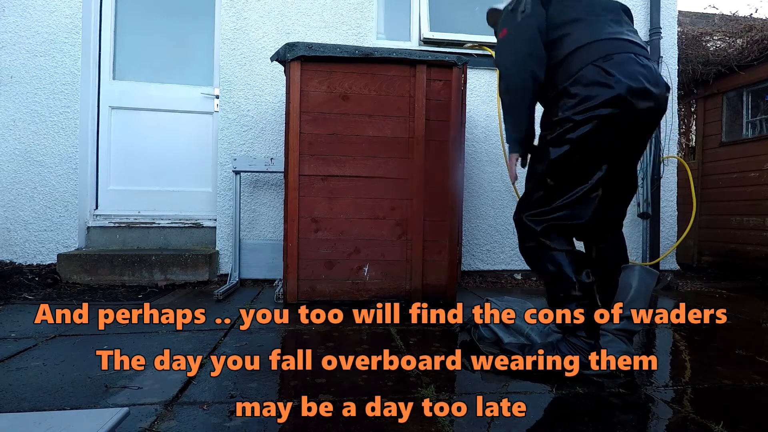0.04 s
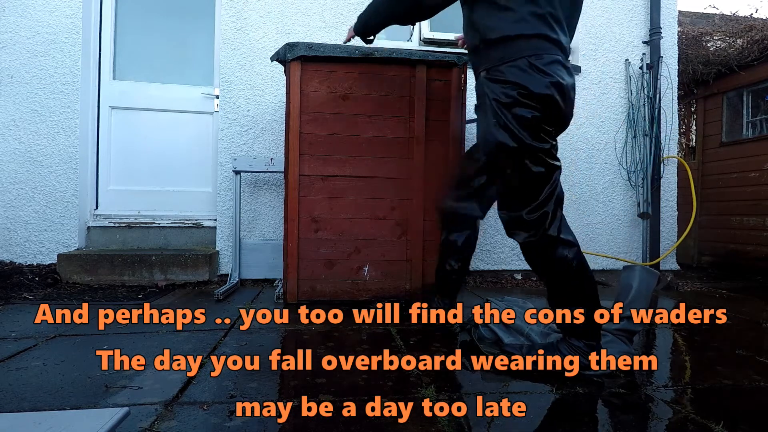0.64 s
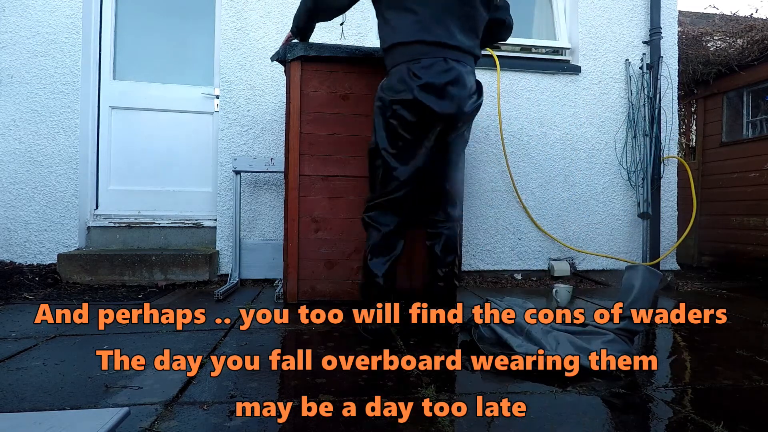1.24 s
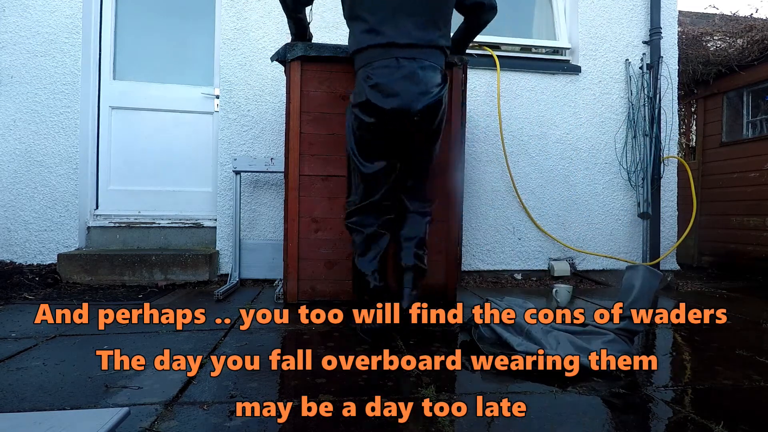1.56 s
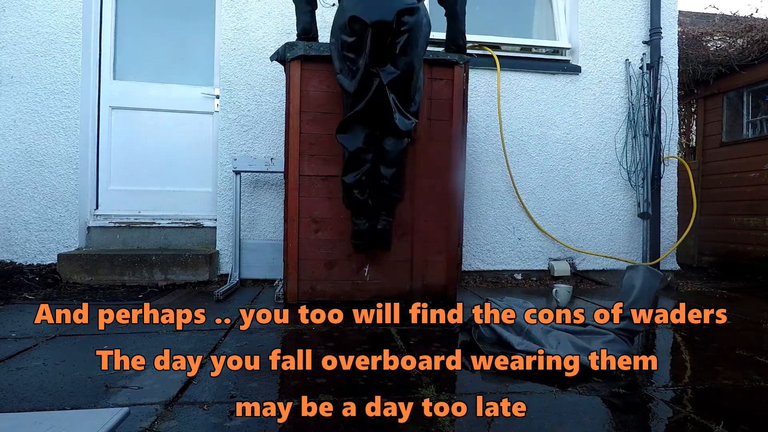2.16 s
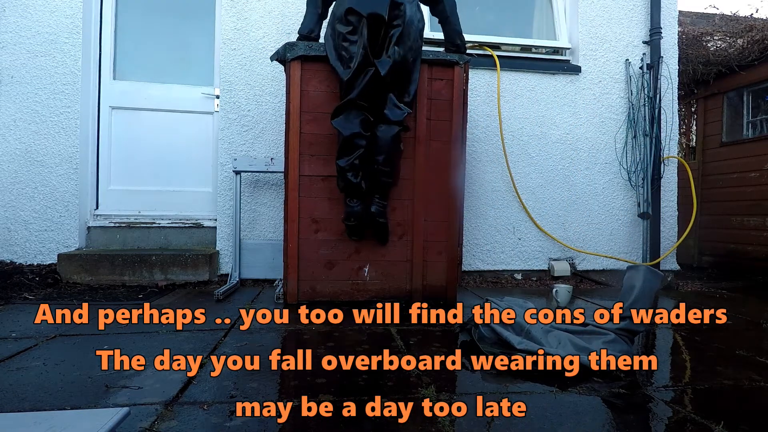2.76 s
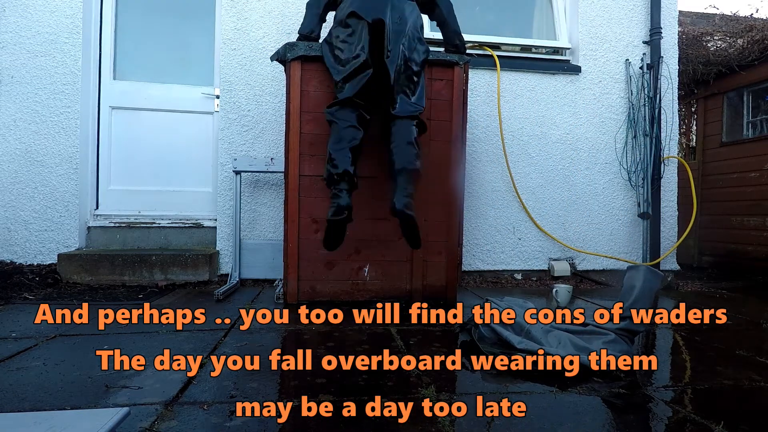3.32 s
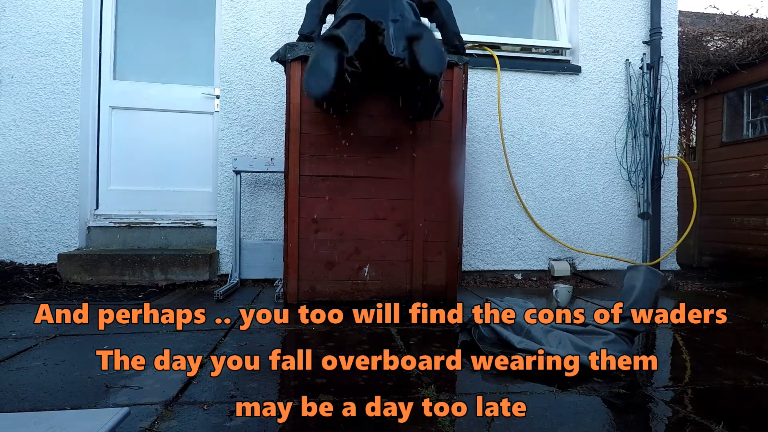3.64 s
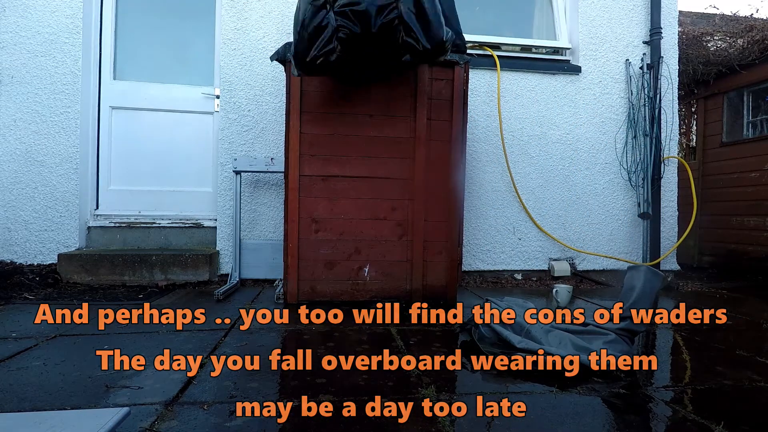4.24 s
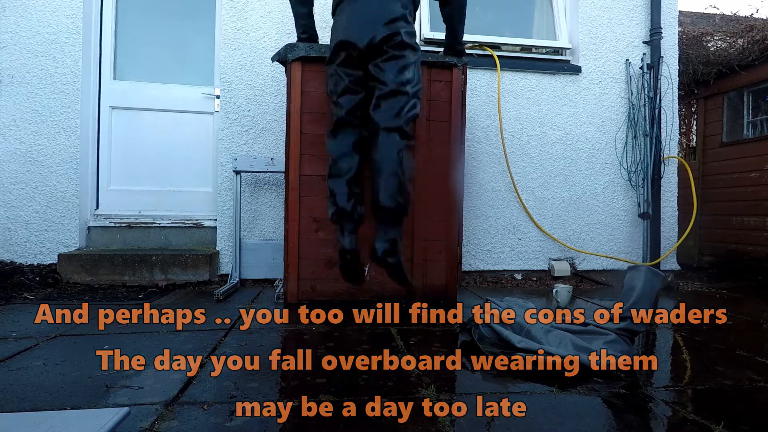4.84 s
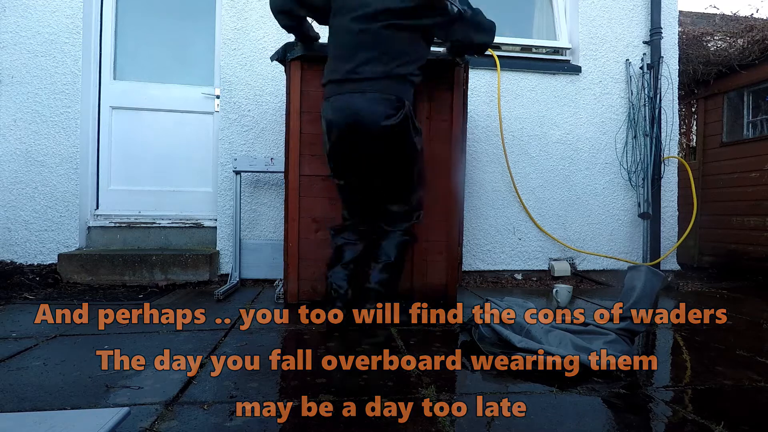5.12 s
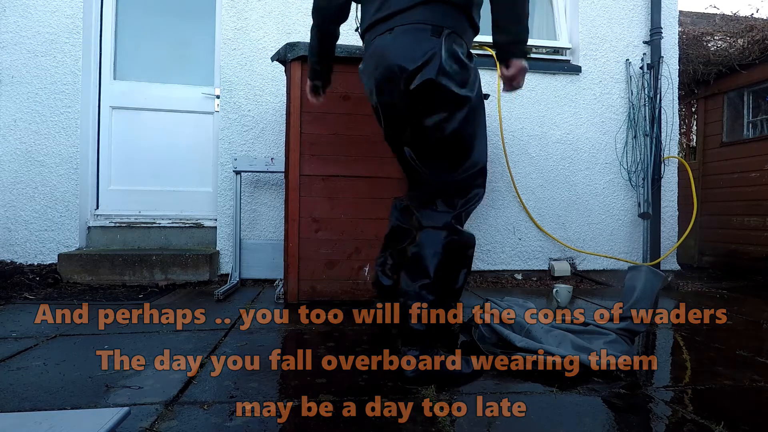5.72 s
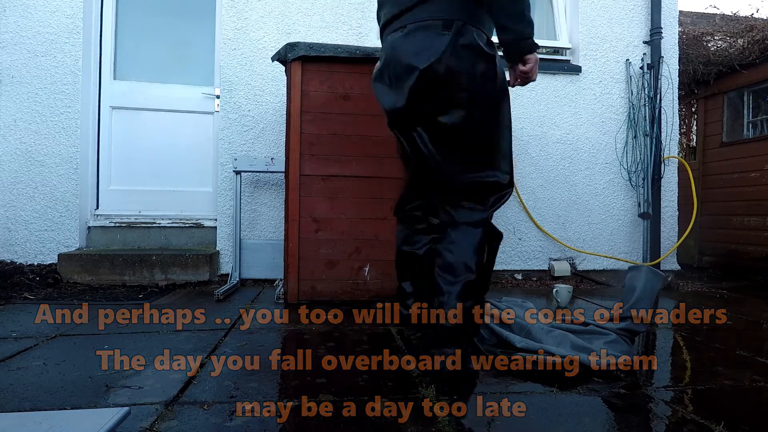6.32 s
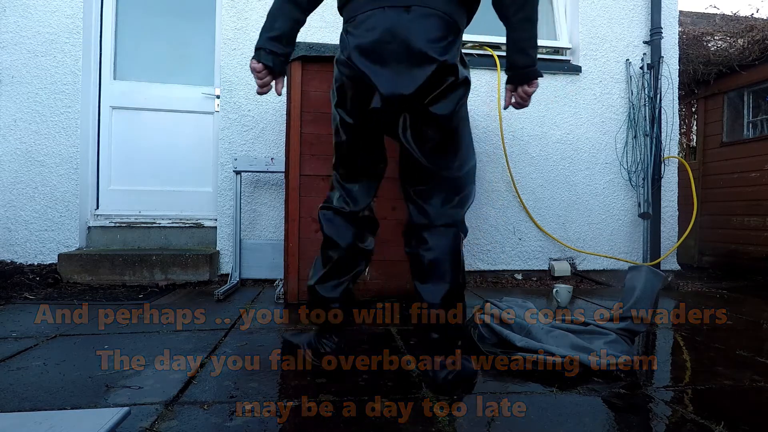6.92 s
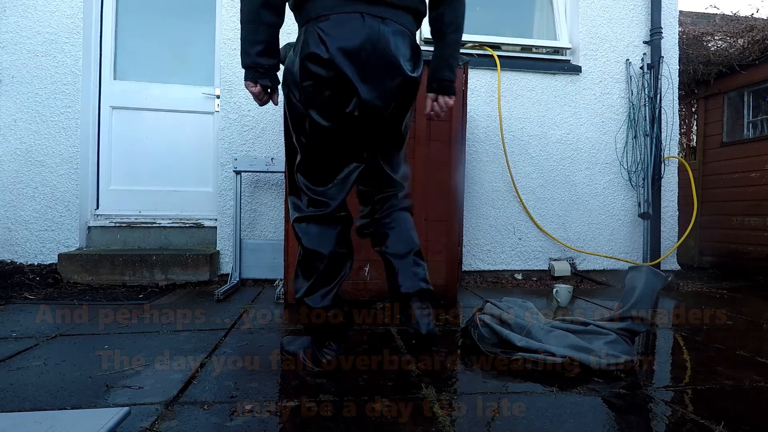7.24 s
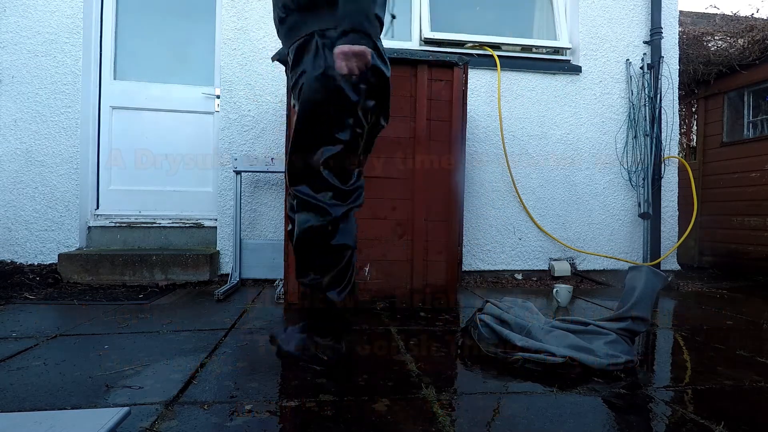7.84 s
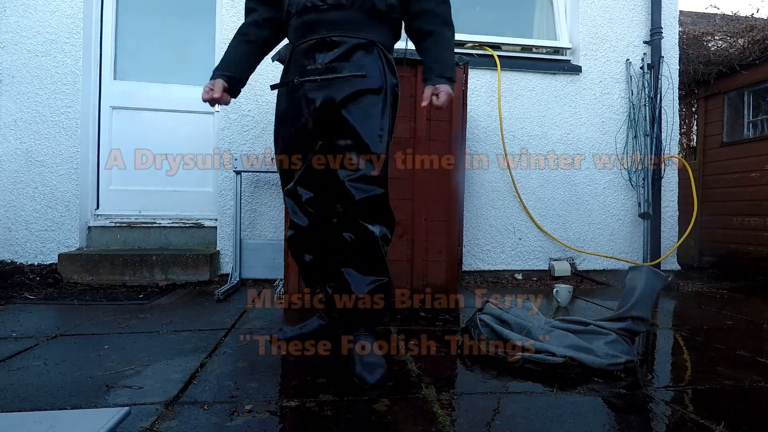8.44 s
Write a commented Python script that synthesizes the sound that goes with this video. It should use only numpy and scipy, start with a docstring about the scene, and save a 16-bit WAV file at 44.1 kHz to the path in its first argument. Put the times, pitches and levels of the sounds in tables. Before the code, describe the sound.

A steady rain-like hiss with fine patter and a low drone runs throughout, outdoors and nearly mono. Wet waders give small, sharp ticks at about 0.7 and 1.6 seconds. Near 2 seconds someone hoists themselves onto a wooden cabinet: the coated cloth snaps taut, rasps and judders over the edge, and a quick cluster of deep, hollow knocks rings the panels until about 2.4 seconds. A soft, lumpy rumble swells with shifts of weight around 3.7 and 4.3 seconds. From 4.6 seconds the waders rasp and judder again as they slide off, bumping the cabinet. At 5 seconds boots land on paving with the loudest dull thuds. More steps and a few crisp cloth snaps follow around 5.4 seconds. Softer, low footsteps and rumble come between 6.6 and 7.1 seconds, then the hiss carries on to the end at about 8.5 seconds.

```python
"""Someone in waders climbs onto a wooden cabinet in a wet yard; nearly mono.
Rain-like hiss and a low drone run throughout; rumble swells with each shift of weight.
From 0.7 s the wet waders tick. Near 2 s, the hoist: they rasp and judder over the edge, the cloth
snaps taut, knocks ring the cabinet. From 4.6 s they rasp and judder again, sliding off.
At 5 s boots land on the paving with dull thuds, then step about until 7.1 s."""
import sys
import numpy as np
from scipy import signal
from scipy.fft import rfft, irfft
from scipy.io import wavfile

SR = 44100
rng = np.random.default_rng(int(sys.argv[2]) if len(sys.argv) > 2 else 0)


def file_out(sig):
    """Save sig as 16-bit WAV at sys.argv[1]."""
    # one column per channel
    cols = np.atleast_2d(sig).T
    # limit, then scale
    lim = np.clip(cols, -1, 1)
    pcm = np.round(lim * 32767).astype(np.int16)
    wavfile.write(sys.argv[1], SR, pcm)


N = 373527
TIME_S = np.arange(N) / SR
BINS_HZ = np.fft.rfftfreq(N, 1 / SR)


def amp(db):
    """dB to gain."""
    return 10 ** (np.asarray(db) / 20)


def unit_rms(x):
    """Scale to rms 1."""
    return x / np.sqrt(np.mean(x ** 2) + 1e-20)


def spectrum_db(points):
    """Interpolate (f/Hz, level/dB) points over log frequency."""
    hz, db = np.transpose(points)
    return np.interp(np.log(BINS_HZ + 1), np.log(hz + 1), db)


def coloured(x, db):
    """Filter x by a gain per bin; rms 1."""
    return unit_rms(irfft(rfft(x) * amp(db), len(x)))


def add(mix, at_s, sound):
    """Mix a sound in at at_s."""
    part = mix[round(at_s * SR):][:len(sound)]
    part += sound[:len(part)]


def grains(per_s, spread_db):
    """Random clicks, many small, few large; rms 1."""
    size = amp(spread_db * np.minimum(rng.exponential(1, N), 4))
    return unit_rms(size * rng.standard_normal(N) * (rng.random(N) < per_s / SR))


def waver(rate_hz, depth_db):
    """Random gain, varying mostly below rate_hz."""
    drift = irfft(rfft(rng.standard_normal(N)) / (1 + (BINS_HZ / rate_hz) ** 2), N)
    return amp(depth_db * unit_rms(drift))


def swell(peak_s, rise_s, fall_s, shape=0.86):
    """Gain peaking at 1; shape 1 is pointed, 2 rounded."""
    width_s = np.where(TIME_S < peak_s, rise_s, fall_s)
    return np.exp(-(abs(TIME_S - peak_s) / width_s) ** shape)


def resonance(x, hz, width_hz):
    """Moving resonance, double pole for steep skirts; rms 1."""
    carrier = np.exp(2j * np.pi * np.cumsum(hz) / SR)
    pole = np.exp(-np.pi * width_hz / SR)
    baseband = signal.lfilter([1], np.convolve([1, -pole], [1, -pole]), x / carrier)
    return unit_rms((carrier * baseband).real)


def thud(db, hz, t60_s, rise_s, scuff_db):
    """Soft, heavy contact: a dying sine, and a dull scuff as the surfaces settle."""
    t = np.arange(SR // 3) / SR
    envelope = (1 - np.exp(-(t / rise_s) ** 2)) * amp(-60 * t / t60_s)
    band = signal.butter(3, [280, 540], "band", fs=SR, output="sos")
    scuff = unit_rms(signal.sosfilt(band, rng.standard_normal(len(t))))
    return amp(db) * envelope * (np.sin(2 * np.pi * hz * t) + amp(scuff_db) * scuff)


def hiss(peak_width_hz=20, patter_db=-9, low_cut_hz=330):
    """Rain-like wash with dense patter, tinted by narrow resonances."""
    # broad spectrum: f/Hz, relative level/dB
    outline = [(560, -19), (760, -7), (950, -10), (1090, -18.5), (1450, -5), (2500, -3.5), (3300, 0.5),
               (3780, 3.5), (4400, -3), (6300, 2.5), (7700, -5), (9700, -9.5), (11200, -18), (15000, -25.5)]
    # resonances and notches: f/Hz, gain/dB
    peaks = [(1173, 8.5), (1291, 4.5), (1442, 3.5), (1668, 4), (1808, 1.5), (1894, 5), (2110, 5),
             (2196, -5.5), (2260, 5.5), (2340, -3), (2433, 4.5), (2648, -2), (2713, 3), (2770, 2.5),
             (2853, 3.5), (2993, 1.5), (3100, 3), (3154, 1), (3219, -24), (3649, -3), (3730, 3.5),
             (4457, 3.5), (5071, 4.5), (6503, 0.5)]
    # loudness curve: t/s, level/dB
    levels = [(0, -42), (.55, -40), (2.8, -40.5), (5.2, -40.5), (5.8, -40), (8.47, -39.7)]
    colour_db = spectrum_db(outline) - 10 * np.log10(1 + (low_cut_hz / (BINS_HZ + 1)) ** 4)
    colour_db += sum(db * np.exp(-.5 * ((BINS_HZ - hz) / peak_width_hz) ** 2) for hz, db in peaks)
    wash = rng.standard_normal(N) + amp(patter_db) * grains(per_s=2500, spread_db=5.0)
    gain = amp(np.interp(TIME_S, *np.transpose(levels)))
    return coloured(wash, colour_db) * gain * waver(rate_hz=31, depth_db=0.5)


def drone(level_db=-32.5):
    """Steady low noise of the yard."""
    # spectrum: f/Hz, relative level/dB
    outline = [(12, -6), (27, -1), (45, -4.5), (59, 4), (85, -5), (125, -7.5), (170, -10), (205, -17),
               (310, -20.5), (370, -29.5), (470, -34), (560, -43.5), (1000, -77)]
    return amp(level_db) * coloured(rng.standard_normal(N), spectrum_db(outline))


def fizz(level_db=-62.5):
    """Faint steady noise above 10 kHz."""
    # spectrum: f/Hz, relative level/dB
    outline = [(10000, -45), (11200, -14), (12200, 3), (13500, 0), (15000, -4.5)]
    return amp(level_db) * coloured(rng.standard_normal(N), spectrum_db(outline))


def wader_ticks(decay_s=0.0012, tail_db=-22, tail_s=0.019, top_hz=8000):
    """Wet waders snap: short noise bursts, each in its own band, with a faint tail."""
    # snaps: t/s, peak level/dB, centre f/Hz, spread/octaves
    snaps = [(.7125, -29, 4500, 1), (0.726, -40.5, 760, 0.26), (1.58, -24, 5800, .45),
             (2.0003, -21, 6000, .5), (2.248, -30, 5700, 0.55), (2.421, -28, 6200, .4),
             (4.974, -25, 5200, 0.5), (5.43, -20.5, 5440, 0.43), (5.429, -19.5, 1780, 0.9),
             (5.4825, -20.5, 5800, 0.21)]
    out, t = np.zeros(N), np.arange(2048) / SR
    hz = np.fft.rfftfreq(len(t), 1 / SR)
    envelope = np.exp(-t / decay_s) + amp(tail_db) * np.exp(-t / tail_s)
    lead = len(t) // 8  # room for the filter's pre-ring
    for at_s, db, centre_hz, spread_oct in snaps:
        band = np.exp(-.5 * (np.log2((hz + 1) / centre_hz) / spread_oct) ** 2)
        band /= np.hypot(1, (hz / top_hz) ** 4)
        burst = np.roll(envelope * rng.standard_normal(len(t)), lead)
        snap = irfft(rfft(burst) * band)
        add(out, at_s - lead / SR, amp(db) * snap / abs(snap).max())
    return out


def body_rumble(rise_share=0.33):
    """Lumpy deep noise, swelling with each shift of weight."""
    # spectrum: f/Hz, relative level/dB
    outline = [(12, -11), (27, 1), (55, 2), (80, 0.5), (125, -15), (200, -19.5), (300, -30), (450, -41.5),
               (700, -40.5), (1100, -69)]
    # weight shifts: peak t/s, level/dB, length/s
    moves = [(1.05, -38, 0.44), (2.13, -20.5, 0.26), (3.72, -31.5, 0.46), (4.303, -32, .6),
             (4.946, -22, 0.29), (5.4, -20.5, .22), (5.997, -29.5, 0.55), (6.68, -23, .7),
             (7.548, -40, 0.83)]
    power = sum((amp(db) * swell(at_s, rise_share * span_s, (1 - rise_share) * span_s, shape=1.3)) ** 2
                for at_s, db, span_s in moves)
    rumble = coloured(rng.standard_normal(N), spectrum_db(outline))
    return rumble * np.sqrt(power) * waver(rate_hz=4.3, depth_db=4.5)


def wader_drag(slips):
    """Coated cloth catches and slips on the edge, rasping and drumming the hollow cabinet."""
    # cloth spectrum: f/Hz, relative level/dB
    rasp_outline = [(300, -29), (560, -12), (750, 5), (950, -9), (1080, -17), (1250, -0.5), (2300, 0),
                    (3700, 4), (4400, 1), (6000, 5), (7500, -2), (9500, -12.5), (11500, -23.5),
                    (15000, -29)]
    # cabinet spectrum: f/Hz, relative level/dB
    drum_outline = [(25, 3.5), (60, -15), (120, 3.5), (190, 6.5), (260, -7.5), (330, -6), (420, -24),
                    (560, -23.5), (900, -24), (1500, -56)]
    # pulls: peak t/s, rise/s, fall/s, rasp level/dB, drum level/dB
    pulls = [(1.914, 0.017, 0.035, -28, -26), (1.995, 0.045, .034, -34.5, -27),
             (2.275, 0.024, 0.043, -44.5, -19), (4.665, 0.023, 0.068, -47, -28),
             (4.8, 0.081, 0.068, -38, -31), (4.973, 0.04, 0.024, -30.5, -26.5),
             (5.04, 0.018, .03, -43, -21.5)]
    rasp = coloured(slips, spectrum_db(rasp_outline)) * waver(rate_hz=130, depth_db=0.64)
    drum = coloured(slips, spectrum_db(drum_outline))
    return sum(swell(at_s, rise_s, fall_s) * (amp(rasp_db) * rasp + amp(drum_db) * drum)
               for at_s, rise_s, fall_s, rasp_db, drum_db in pulls)


def rubber_judder(slips, attack_s=0.024, release_s=0.016, sag_hz_per_s=320, fade_db_per_s=18):
    """Rubber judders on wood, slowing and weakening until each slide ends."""
    # slides: start t/s, length/s, level/dB, initial f/Hz
    slides = [(1.908, 0.19, -29, 243), (4.644, 0.32, -37.5, 298), (4.912, .035, -23.5, 194)]
    out = np.zeros(N)
    for start_s, length_s, db, hz in slides:
        age_s = np.clip(TIME_S - start_s, 0, length_s)
        attack = np.minimum(age_s / attack_s, 1)
        release = np.exp(-np.maximum(TIME_S - start_s - length_s, 0) / release_s)
        judder = resonance(slips, hz - sag_hz_per_s * age_s, width_hz=82)
        out += judder * attack * release * amp(db - fade_db_per_s * age_s)
    return out


def taut_cloth(slips, at_s=1.918, rise_s=0.012, stretch_s=0.021, slack_hz=1260, taut_hz=1740):
    """Cloth snaps tight: a hollow ring flares, climbs with tension and lingers."""
    tension = .5 + .5 * np.tanh((TIME_S - at_s) / stretch_s)
    ring = resonance(slips, slack_hz + (taut_hz - slack_hz) * tension, width_hz=340)
    flare = amp(-34.5) * swell(at_s, rise_s, fall_s=0.013)
    linger = amp(-39.5) * swell(at_s, rise_s, fall_s=0.07)
    return ring * (flare + linger)


def cabinet_knocks(t60_cycles=11.6, ring_db=-26, ring_rise_s=0.0026):
    """Knees, boots and hands thud on the cabinet and ring its panels."""
    # blows: t/s, level/dB, thud f/Hz
    knocks = [(1.929, -12, 84), (2.128, -9.5, 63), (2.145, -9.5, 97.6), (2.243, -5.5, 92),
              (2.266, -2.5, 172), (2.292, -5.5, 106), (2.329, -14, 160), (4.848, -17.5, 64),
              (4.974, -2.5, 118)]
    # panel modes: f/Hz, relative level/dB, t60/s
    modes = [(62.5, 2.5, 0.84), (96, 11, 0.52), (136.2, 13.5, 0.48), (174, -9, 0.18), (234, 8, .22),
             (267, 1.5, 0.39), (332, -21, 0.22), (367, -22, 0.19), (428, -23, .2), (727, -28, .15)]
    out, t = np.zeros(N), np.arange(SR // 2) / SR
    for at_s, db, hz in knocks:
        add(out, at_s, thud(db, hz, t60_cycles / hz, rise_s=0.0037, scuff_db=-34))
        ring = np.zeros(len(t))
        for mode_hz, mode_db, t60_s in modes:
            mode = amp(mode_db - 60 * t / t60_s) * np.sin(2 * np.pi * (mode_hz * t + rng.random()))
            ring += mode / np.hypot(1, mode_hz / (2 * hz))  # soft blows barely reach high modes
        add(out, at_s, amp(db + ring_db) * ring * (1 - np.exp(-t / ring_rise_s)))
    return out


def boot_steps(scuff_db=-28, scuff_db_per_db=0.57):
    """Soft soles thud on paving; light steps hardly scuff."""
    # contacts: t/s, level/dB, thud f/Hz, t60/s
    steps = [(4.998, 1.5, 62.4, 0.027), (5.0164, 2, 104.6, 0.063), (5.037, -4.5, 94.5, 0.14),
             (5.134, -11, 88.5, 0.1), (5.385, -9, 62, 0.036), (5.439, -4.5, 98, 0.028),
             (5.4856, -3.5, 86.4, 0.16), (6.623, -7, 41.5, 0.066), (6.768, -12, 49, 0.075),
             (6.951, -17, 62, .1), (7.095, -6, 45.3, 0.069)]
    out = np.zeros(N)
    for at_s, db, hz, t60_s in steps:
        add(out, at_s, thud(db, hz, t60_s, rise_s=0.0045, scuff_db=scuff_db + scuff_db_per_db * db))
    return out


def scene():
    """Stereo mix: fizz in antiphase, all else centred."""
    mid = hiss() + drone() + wader_ticks() + body_rumble()
    slips = grains(per_s=4300, spread_db=2.5) + amp(3) * rng.standard_normal(N)  # wader friction
    mid += wader_drag(slips) + rubber_judder(slips) + taut_cloth(slips)
    mid += cabinet_knocks() + boot_steps()
    side = fizz()
    return np.array([mid + side, mid - side])


def record(dry):
    """Band limit: low-pass at 15250 Hz."""
    low_pass = signal.firwin(511, 15250, window=("kaiser", 9), fs=SR)
    return signal.oaconvolve(dry, low_pass[None], "same")


dry = scene()
out = record(dry)
file_out(out)
```